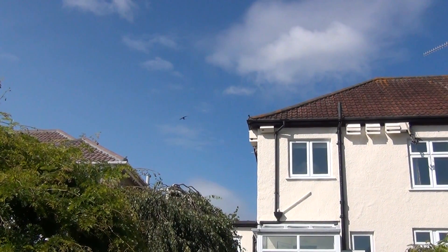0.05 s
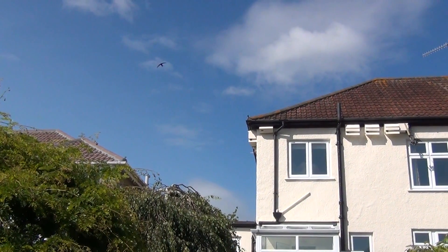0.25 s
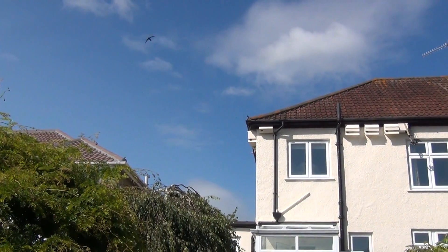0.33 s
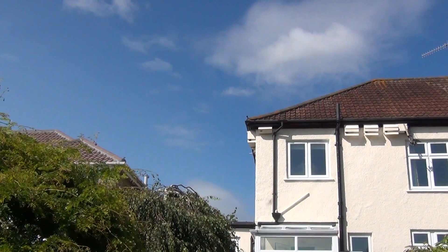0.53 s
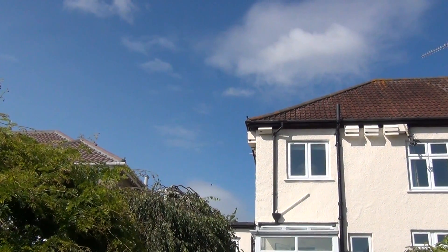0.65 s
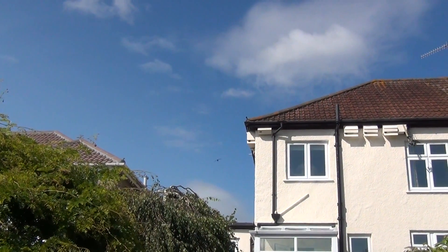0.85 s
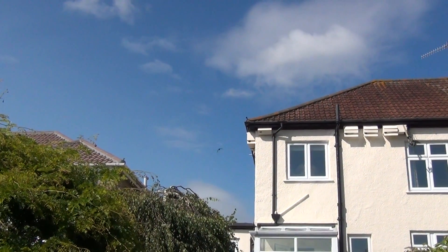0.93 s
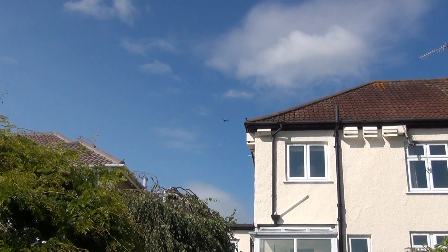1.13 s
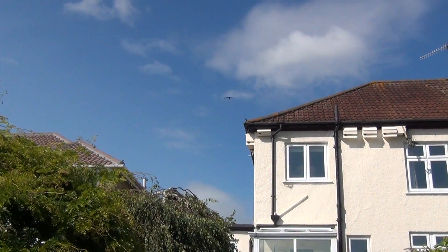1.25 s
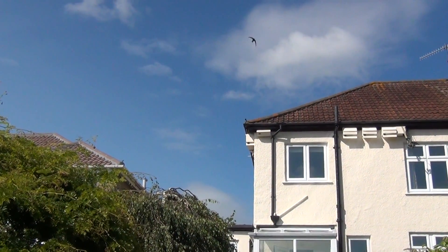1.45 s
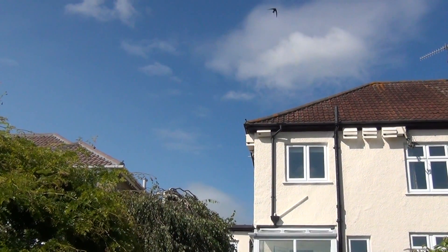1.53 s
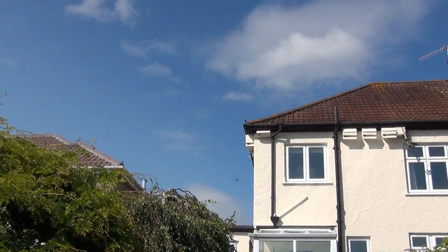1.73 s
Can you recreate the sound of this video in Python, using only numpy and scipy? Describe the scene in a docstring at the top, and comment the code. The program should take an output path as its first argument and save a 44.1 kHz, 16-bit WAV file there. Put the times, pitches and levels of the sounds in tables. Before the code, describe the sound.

Swifts screaming near a house. Faint high bird whistles far off at 0-0.2 s, then a shrill buzzing scream rises from 0.2 s and shatters into fast falling chirps at 0.5-0.65 s. A second, raspier one runs 0.7-1.13 s with slower pulses; a third, purer, leaning left, 1.16-1.55 s. Walls echo lightly. Steady distant traffic rumble, soft hiss and a barely audible high whine continue to 1.8 s.

```python
"""Over steady traffic rumble, air hiss and a faint high whine, far birds whistle softly at the start.
Three swift screams follow before a house front: each is a harmonic tone rising into a whistle whose level
and pitch flutter some 300 times a second, with a third partial and a noisy rasp in puffs, one each beat.
Each scream breaks up into a run of short pulses, falling at its end: brief tones with noise ticks.
Walls return all of these near calls as delayed copies and a decaying diffuse tail."""
import sys
import numpy as np
from scipy import signal
from scipy.io import wavfile

SR = 44100
rng = np.random.default_rng(int(sys.argv[2]) if len(sys.argv) > 2 else 0)


def volts_from_db(level):
    """Convert decibel levels to linear amplitude ratios."""
    exponent = np.asarray(level, float) / 20
    return 10 ** exponent


def store_wav(level_fs):
    """Save 16-bit WAV to argv[1]."""
    pcm = np.round(np.clip(np.atleast_2d(level_fs), -1, 1) * 32767)
    wavfile.write(sys.argv[1], SR, pcm.T.astype(np.int16))


N = 79380  # samples, 1.8 s

# Background spectrum. Each row: frequency in Hz, relative density in dB per Hz.
AMBIENCE_SPECTRUM = [(22,-26),(40,-8.5),(58,-6.5),(85,-11),(150,-7.5),(240,-4),(600,-4.5),(900,-4),(1300,-9.5),(2000,-20.5),(3160,-26),(5140,-30.5),(11000,-32),(16000,-31.5)]
# Background loudness. Each row: time in seconds, rms level in dB.
AMBIENCE_LEVEL = [(0.0, -42.5), (0.174, -43.5), (0.18, -43), (1.322, -40.5), (1.348, -41), (1.8, -41.5)]
# Background stereo correlation. Each row: frequency in Hz, left-right likeness from 0 to 1.
STEREO_LIKENESS = [(60, 1.0), (125, 0.99), (250, 0.99), (500, 0.98), (1000, 0.92), (2400, 0.74),
                   (6000, 0.62), (15000, 1)]
# Background stereo balance. Each row: frequency in Hz, left over right in dB.
STEREO_LEAN = [(150, -0.2), (400, 1.3), (950, 1.6), (3770, 0.3), (15000, -0.5)]
# Far birds. Each row: start in seconds, length in seconds, level in dB, start pitch in Hz, end pitch in Hz.
FAR_CALLS = [(0.018, 0.097, -56.5, 5980, 6120), (0.027, 0.1, -60, 5200, 5400),
             (0.093, 0.085, -62, 5700, 5580), (0.119, .06, -68, 6100, 6300)]
# Wall echoes. Each row: delay in seconds, level in dB, left over right in dB.
WALL_ECHOES = [(.0072, -14.5, -8), (0.0119, -20.5, 14), (.021, -17, -12.5)]
# Closing pulses. Each row: start in seconds, peak level in dB, pitch of the second partial in Hz,
# third partial in dB, fourth partial in dB, left over right in dB, hold in seconds,
# pitch offset at the onset in percent, tick in dB relative to the pulse.
PULSES = [(0.507, -28, 6440, -23, -1, 1, 0.003, -1.8, -26),
          (0.519, -19.5, 6410, -23, -10, 2, 0.003, -2.0, -26),
          (0.5315, -18, 6510, -21, -6, -2, 0.003, -2.3, -24),
          (0.5427, -16, 6520, -20, -7, 6.5, 0.002, -2.2, -21),
          (0.5555, -17.5, 6380, -19, -3.5, -1, 0.0046, -1.7, -23),
          (0.5687, -20, 6270, -28, -4, 3.5, 0.0032, -1.7, -24),
          (0.5811, -20, 6140, -20, -8, 3, 0.003, -2.3, -26),
          (0.5948, -20, 6090, -34, -7.5, 1.5, 0.0041, -1.6, -23),
          (0.6083, -29, 6030, -16, -6, 6, 0.0024, -19, -28),
          (0.623, -22, 5960, -34, -10, 2.5, 0.0019, -23, -34),
          (0.6368, -26.5, 5810, -26, -10, 5, 0.0018, -27, -28),
          (0.9613, -26, 5970, -24, -10, 4, 0.0033, 1.5, -18),
          (0.9802, -22, 6450, -19, -8, 3.5, 0.005, 1.5, -15),
          (0.9993, -18.5, 6464, -15.5, -9, 3.0, 0.0041, 2, -13),
          (1.0196, -21.5, 6230, -22, -9, 2.5, 0.0042, 1.5, -10),
          (1.0395, -21.5, 6100, -17, -6, 2, 0.0038, 1.5, -15),
          (1.0593, -22, 6010, -21, -9, 4.5, 0.0035, 2, -10),
          (1.0807, -26.5, 5660, -16, -3, 0, 0.0035, 1.7, -16),
          (1.1027, -27, 5230, -20, -15, 3, 0.0026, 1.5, -18),
          (1.1233, -38.5, 4120, -24, -33, 1.0, 0.004, 22.6, -22),
          (1.4111, -23, 6350, -25, -15, 0, 0.0054, -3.6, -30),
          (1.4244, -24.5, 6224, -23, -21, 13, 0.0068, -1.4, -26),
          (1.4364, -28, 6110, -19, -15, 5, 0.0074, -2.0, -27),
          (1.4493, -24, 6050, -22, -15.5, 10, 0.0035, -2.0, -30),
          (1.463, -28.5, 5980, -17, -18, 8.5, 0.0059, -1.7, -30),
          (1.478, -25, 5940, -33, -19, 9, 0.0045, -2.0, -30),
          (1.492, -27.5, 5960, -20, -17.5, 11, 0.0039, -19, -30),
          (1.507, -29, 5830, -20, -18, 9.0, 0.0033, -16, -30),
          (1.5203, -32.5, 5550, -22, -21, 15, 0.002, -17, -30),
          (1.537, -35, 5800, -25, -15, 14, 0.0018, -18, -27)]
# Held part of each scream, one list per scream. Each row: time in seconds, pitch of the second partial in Hz,
# level in dB, third partial in dB, fourth partial in dB, flutter depth from 0 to 1, roughness from 0 to 1,
# left over right in dB, pitch swing in percent, rasp in dB relative to the tone.
SCREAMS = [
    [(0.198, 4696, -58, -16, -12, 0.4, 0.15, 12, 1.9, -32),
     (0.206, 5054, -43.5, -33, -17, 0.5, 0.03, -6, 1.9, -32),
     (0.222, 5947, -40.5, -44, -15, 0.5, 0.1, 4, 1.9, -45),
     (0.23, 6320, -40, -36, -15, 0.3, 0.17, 2.5, 1.9, -36),
     (0.238, 5677, -37.5, -46, -18, 0.4, 0, 3.0, 1.9, -35),
     (0.258, 5797, -28, -37, -16, 0.2, 0, 2.5, 1.9, -45),
     (0.268, 5866, -34.5, -16.5, -2.5, 0.44, 0.13, 0, 1.7, -53),
     (0.322, 6192, -28.5, -19, -13.5, 0.5, 0, 4.5, 1.6, -54),
     (0.33, 6225, -37, -19, -3, 0.5, 0.08, 2.0, 1.9, -37),
     (0.346, 6185, -34.5, -9, -4, 0.5, 0.01, 2, 1.9, -33),
     (0.36, 6110, -31.5, -20, -9, 0.5, 0.12, 4, 1.9, -48),
     (0.388, 6255, -32, -15, -5, 0.54, 0.06, 2.5, 1.9, -36),
     (0.416, 6290, -28, -24, -10.5, 0.54, 0.05, 4, 1.5, -34),
     (0.472, 6314, -24.5, -28, -9, 0.54, 0.12, 1.5, 1.7, -31),
     (0.506, 6450, -29.5, -30, -21, 0.5, 0.17, 1.0, 1.9, -11)],
    [(0.687, 4850, -51, -6, -16, 0.43, 0.08, -4, 1.9, -23),
     (0.701, 5340, -36, -36, -10.5, 0.4, 0.12, 2.5, 1.9, -41),
     (0.729, 5670, -34.5, -48, -10, 0, 0.02, 1.0, 1.9, -50),
     (0.759, 6070, -33.5, -28, -8.5, 0.4, 0.12, 3.5, 1.9, -43),
     (0.779, 6008, -30.5, -20.5, -3, 0.23, 0, 0, 2, -39.5),
     (0.835, 6074, -30, -29, -17, 0.54, 0.15, 2, 1.8, -21),
     (0.861, 6150, -35, -28, -12, 0.54, 0.1, 0.0, 1.8, -15),
     (0.869, 6076, -32, -27, -12, 0.54, 0.1, 1, 1.7, -26),
     (0.909, 6194, -32, -25, -15.5, 0.54, 0.17, 2.5, 1.6, -17.5),
     (0.957, 5930, -38.5, -31, -12, 0.54, 0.17, 2.5, 1.9, -11)],
    [(1.158, 4397, -58, -27, -23, 0.3, 0.1, 1, 1.9, -49),
     (1.17, 4880, -36, -33, -47, 0.3, 0.17, 5, 2.1, -29),
     (1.182, 5420, -34.5, -55, -20, 0.1, 0, 9, 1.9, -30),
     (1.202, 5730, -32, -25, -19, 0.05, 0, 6.5, 1.9, -46),
     (1.232, 5917, -28, -24, -15.5, 0.07, 0, 6.0, 1.9, -56),
     (1.27, 6050, -29.5, -25, -23, 0.25, 0.03, 8, 2.1, -62),
     (1.286, 6047, -25.5, -25, -21, 0.1, 0.08, 3.5, 1.9, -37),
     (1.304, 6097, -27.5, -29, -24, 0.3, 0, 5, 2.2, -45),
     (1.312, 6073, -28, -26, -20, 0.5, 0.07, 7, 2.2, -60),
     (1.366, 6141, -33.5, -18, -18, 0.5, 0.04, 7.5, 2.3, -58),
     (1.374, 6120, -31, -17, -18, 0.5, 0.03, 10, 2.1, -37),
     (1.396, 6180, -27.5, -33, -19, 0.22, 0.17, 1, 2.2, -38),
     (1.408, 6270, -24, -21, -21, 0.4, 0, 14, 2.4, -37)],
]
# Flutter of each scream. Each row: rate at the start in Hz, rate at the end in Hz.
FLUTTER_RATES = [(316.4, 340), (272, 390), (290, 222)]


def rms_one(x):
    """Normalization: scale to unit root-mean-square."""
    return x / np.sqrt(np.mean(x ** 2) + 1e-20)


def at_hz(points, hz):
    """Interpolation along a logarithmic frequency axis."""
    table_hz, values = np.transpose(points)
    return np.interp(np.log(hz), np.log(table_hz), values)


def drift(rate, size):
    """Random modulation: white noise through a double one-pole low-pass at rate Hz, rms 1."""
    r = np.exp(-2 * np.pi * rate / SR)
    noise = rng.standard_normal(size + SR // 2)
    # the first half second lets the filter settle
    return rms_one(signal.lfilter([1], [1, -2 * r, r * r], noise)[SR // 2:])


def panned(x, pan_db):
    """Intensity stereophony: a level difference places the source between left and right."""
    return np.array([x * volts_from_db(pan_db / 2), x * volts_from_db(-pan_db / 2)])


def band_filter(order, band_hz):
    """Butterworth band-pass: a maximally flat response between two frequencies."""
    return signal.butter(order, band_hz, "band", fs=SR, output="sos")


def ambience(patchy_db):
    """Filtered noise: third-octave bands of rumble and hiss, partly correlated, with a slight flicker."""
    out = 0
    edges = 22 * 2 ** np.arange(0, 9.7, 1 / 3)
    opposite = np.array([[1], [-1]])
    # two noise pairs taken in turn keep adjacent bands independent
    white = rng.standard_normal((2, 2, N + SR // 4))
    for k, (low, high) in enumerate(zip(edges, edges[1:])):
        mid, side = signal.sosfilt(band_filter(2, [low, high]), white[k % 2])[:, SR // 4:]
        hz = np.sqrt(low * high)
        alike = np.clip(at_hz(STEREO_LIKENESS, hz), 0, 1)
        gain = volts_from_db(at_hz(AMBIENCE_SPECTRUM, hz) + patchy_db * drift(15.0, N))
        lean = volts_from_db(at_hz(STEREO_LEAN, hz) / 2 * opposite)
        stereo = np.sqrt(1 + alike) * mid + np.sqrt(1 - alike) * side * opposite
        out = out + gain * lean * stereo
    s, db = np.transpose(AMBIENCE_LEVEL)
    return rms_one(out) * volts_from_db(np.interp(np.arange(N) / SR, s, db))


def whine():
    """Pure tone: one steady sinusoid at 15625 Hz, -75 dB rms, equal in both channels."""
    return np.sqrt(2) * volts_from_db(-75) * np.sin(2 * np.pi * 15625 * np.arange(N) / SR)


def voice(hz, shape, third_db, octave_db, odd_shape=1):
    """Harmonic series: partials 1-4 of a syrinx tone whose second partial, at hz, is the strongest."""
    phase = np.pi * np.cumsum(hz) / SR + rng.uniform(0, 2 * np.pi)
    fundamental = volts_from_db(-18) * np.sin(phase)  # dB relative to the third partial
    odd = volts_from_db(third_db) * (fundamental + odd_shape * np.sin(3 * phase))
    # the exponent makes the octave follow the envelope more steeply
    octave = shape ** 1.84 * volts_from_db(octave_db) * np.sin(4 * phase)
    return shape * (np.sin(2 * phase) + odd) + octave


def far_birds():
    """Frequency and amplitude modulation: faint gliding whistles waver in pitch and level."""
    out = np.zeros(N)
    for s, length, db, start_hz, end_hz in FAR_CALLS:
        n = int(length * SR)
        i = int(s * SR)
        hz = np.linspace(start_hz, end_hz, n) + 150 * drift(240.0, n)
        shape = np.hanning(n) ** .5 * (1 + .5 * drift(100.0, n))
        out[i:i + n] += volts_from_db(db) * voice(hz, np.maximum(shape, 0), -30, -27)
    return panned(out, 2.7)


def yard(x):
    """Reflection and reverberation: discrete wall echoes, then a diffuse tail partly own to each ear."""
    t60_s, tail_db, treble_cut_hz = 0.41, -11, 14100
    out = np.zeros((2, N))
    for delay, db, pan in WALL_ECHOES:
        d = int(delay * SR)
        out[:, d:] += panned(volts_from_db(db) * x[:N - d], pan)
    t = np.arange(SR // 2) / SR
    shared = rng.standard_normal(len(t))
    own = rng.standard_normal((2, len(t)))
    tail = (shared + .8 * own) * volts_from_db(-60 * t / t60_s) * np.clip(t / .004, 0, 1)
    tail = tail / np.sqrt(np.sum(tail[0] ** 2))  # unit energy in the left channel
    out += volts_from_db(tail_db) * signal.fftconvolve(x[None], tail, axes=1)[:, :N]
    return signal.sosfilt(signal.butter(1, treble_cut_hz, fs=SR, output="sos"), out)


def pulses():
    """Transient tones: each starts with a noise tick, slides to its pitch, holds while sagging, and decays."""
    attack_s, release_s, sag_hz_per_s = .0012, .0015, 28000
    scoop_s, tick_s = .001, .0022  # time constants of the onset slide and of the tick
    out = np.zeros((2, N))
    t = np.arange(SR // 50) / SR
    band = band_filter(2, (6800, 10000))
    for s, db, hz, third, octave, pan, hold, scoop, tick_db in PULSES:
        attack = np.sin(np.pi / 2 * np.clip(t / attack_s, 0, 1)) ** 2
        shape = attack * np.exp(-np.maximum(t - hold, 0) / release_s)
        sag = sag_hz_per_s * (t - hold / 2)
        pitch = hz - sag + hz * scoop / 100 * np.exp(-t / scoop_s)
        burst = rng.standard_normal(len(t)) * np.exp(-t / tick_s)
        tick = volts_from_db(tick_db) * signal.sosfilt(band, burst)
        tone = voice(pitch, shape, third, octave)
        i = int(s * SR)
        out[:, i:i + len(t)] += panned(volts_from_db(db) * (tone + tick), pan)
    return out


def screams():
    """Joint amplitude and frequency modulation: a fluttering whistle, third partial and rasp in puffs."""
    lead_rad, flutter_jitter, pitch_jitter_hz = 1.2, .02, 17.8  # lead of pitch over level
    rough_width_hz, puff_power, fade_s, wobble_db = 390, 1.2, .003, .9
    out = np.zeros((2, N))
    band = band_filter(2, (6600, 10800))
    for rows, (start_hz, end_hz) in zip(SCREAMS, FLUTTER_RATES):
        s, *columns = np.transpose(rows)
        first, last = int(s[0] * SR), int(s[-1] * SR)
        t = np.arange(first, last) / SR
        n = len(t)
        hz, db, third, octave, depth, rough, pan, swing, rasp_db = [np.interp(t, s, c) for c in columns]
        rough = np.clip(rough, 0, 1)
        depth = np.clip(depth, 0, 1)

        rate = np.linspace(start_hz, end_hz, n)
        rate = rate * (1 + (flutter_jitter + rough / 2) * drift(24.0, n))
        beat = 2 * np.pi * np.cumsum(rate) / SR
        # flutter depth leaves the mean power unchanged
        shape = (1 + depth * np.cos(beat)) / np.sqrt(1 + depth ** 2 / 2)
        shape = shape * (1 + rough * drift(rough_width_hz, n).clip(-1, 3))
        pitch_beat = np.cos(beat + lead_rad)
        hz = hz * (1 + swing / 100 * pitch_beat) + pitch_jitter_hz * drift(44.0, n)

        puff = rms_one((1 + pitch_beat) ** puff_power)
        grain = rms_one(1 + .3 * drift(560.0, n))
        hiss = rms_one(signal.sosfilt(band, rng.standard_normal(n)))
        rasp = volts_from_db(rasp_db) * puff * hiss
        whistle = np.sqrt(2) * voice(hz, np.maximum(shape, 0), third, octave, puff * grain)
        fade = np.clip(np.minimum(t - s[0], s[-1] - t) / fade_s, 0, 1)
        level = volts_from_db(db + wobble_db * drift(24.0, n))
        out[:, first:last] += panned((whistle + rasp) * fade * level, pan)
    return out


def scene():
    """Superposition: near birds, their reflections, far birds and the background add linearly."""
    birds = screams() + pulses()
    echoes = yard(birds.mean(axis=0))
    return birds + echoes + far_birds() + ambience(patchy_db=0.99) + whine()


def top_cut(x):
    """Band limitation: the treble ends steeply above 16780 Hz."""
    return signal.sosfilt(signal.butter(12, 16780, fs=SR, output="sos"), x)


def record(dry):
    """Band limitation: a steep low-pass removes the top, 60 dB down from 16300 Hz."""
    low_pass = signal.cheby2(12, 60, 16300, fs=SR, output="sos")
    mix = signal.sosfilt(low_pass, dry)
    return top_cut(mix)


dry = scene()
out = record(dry)
store_wav(out)
```